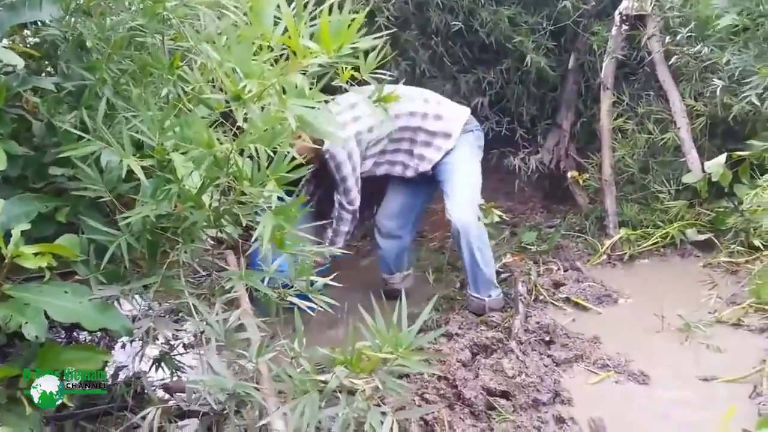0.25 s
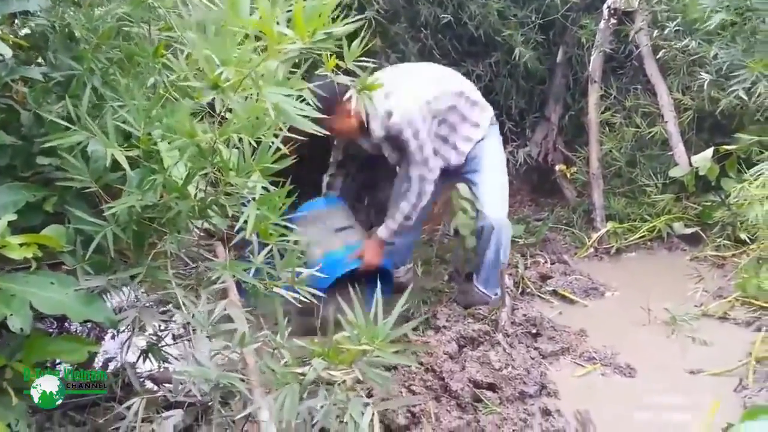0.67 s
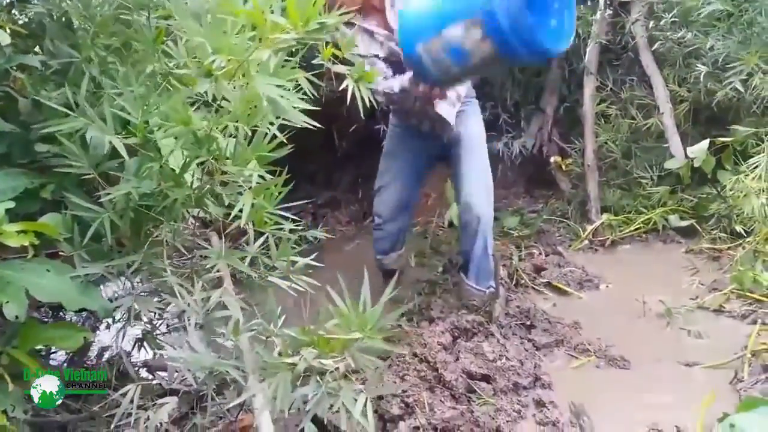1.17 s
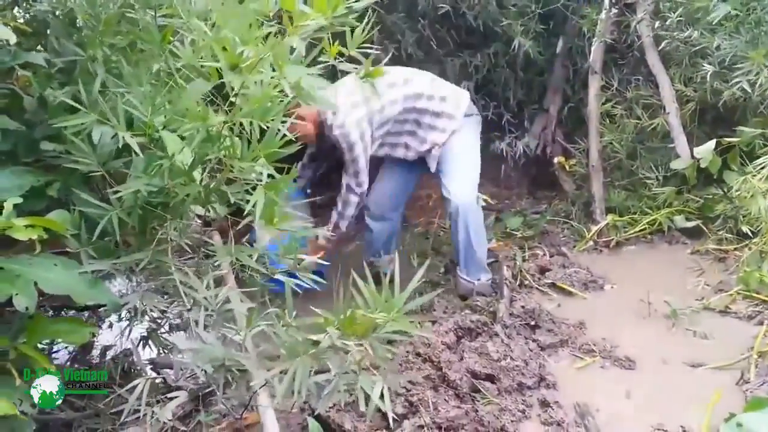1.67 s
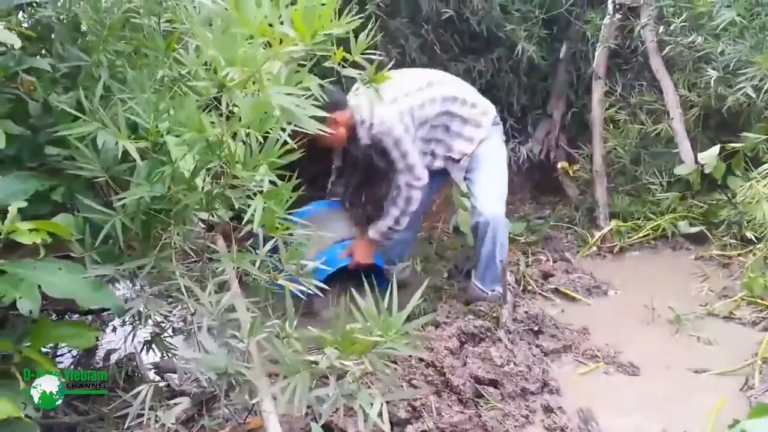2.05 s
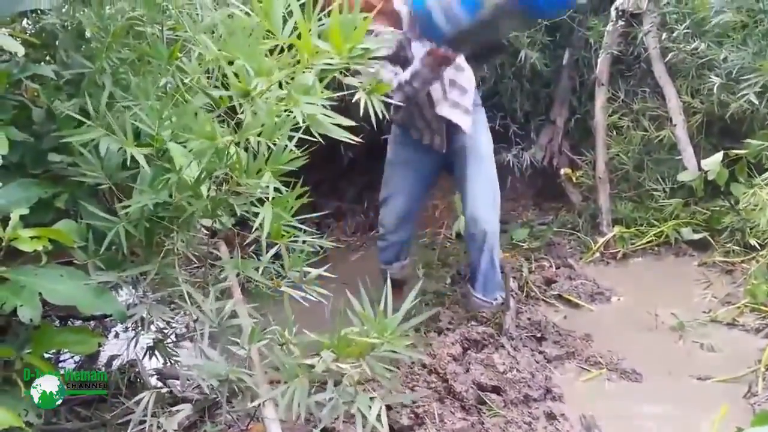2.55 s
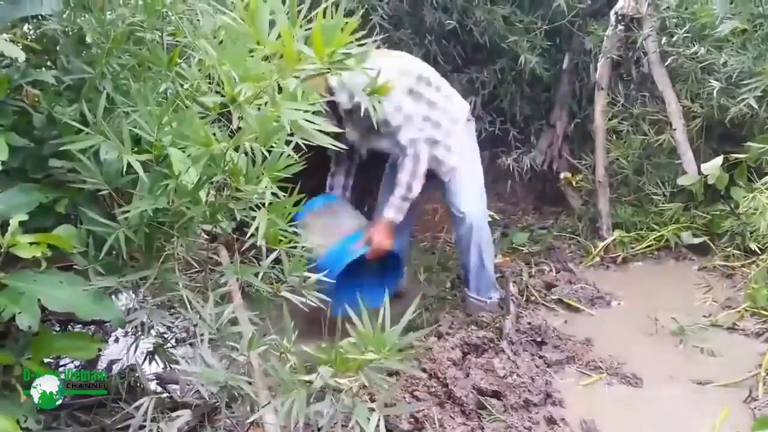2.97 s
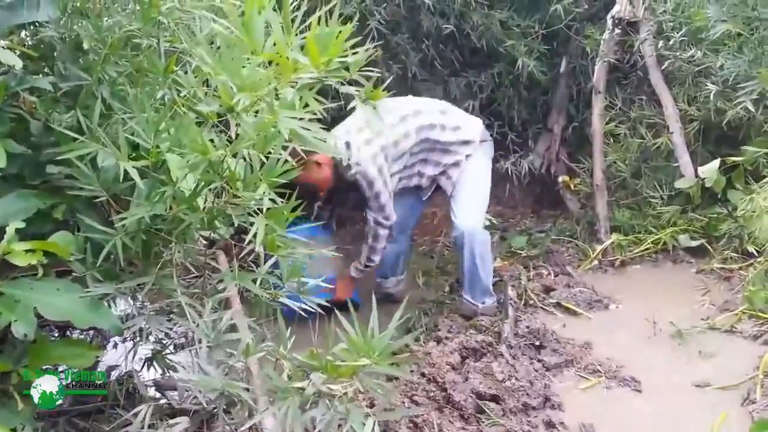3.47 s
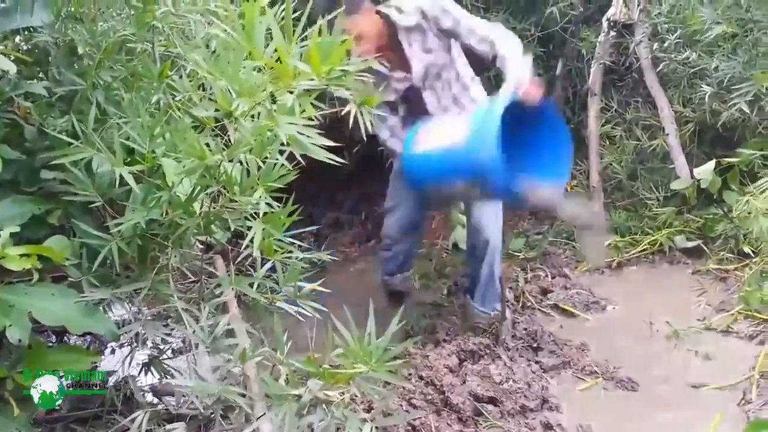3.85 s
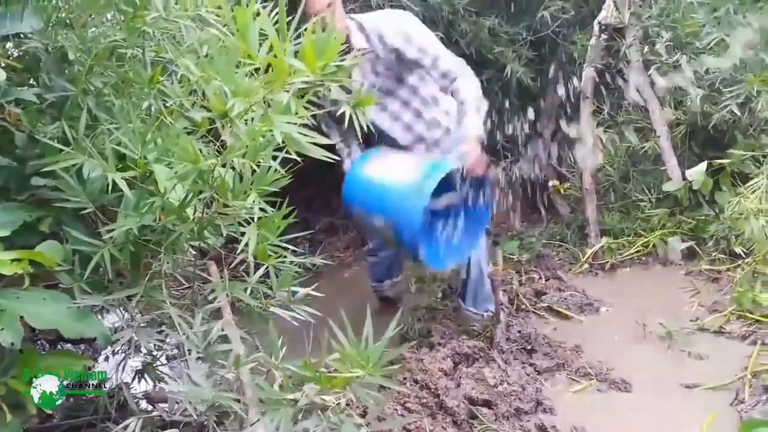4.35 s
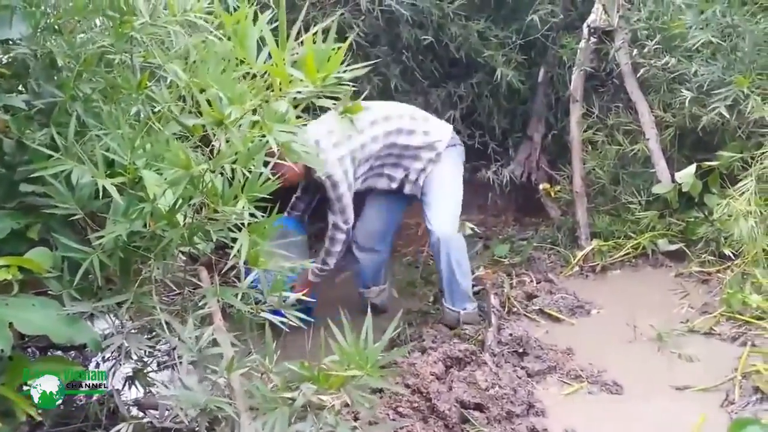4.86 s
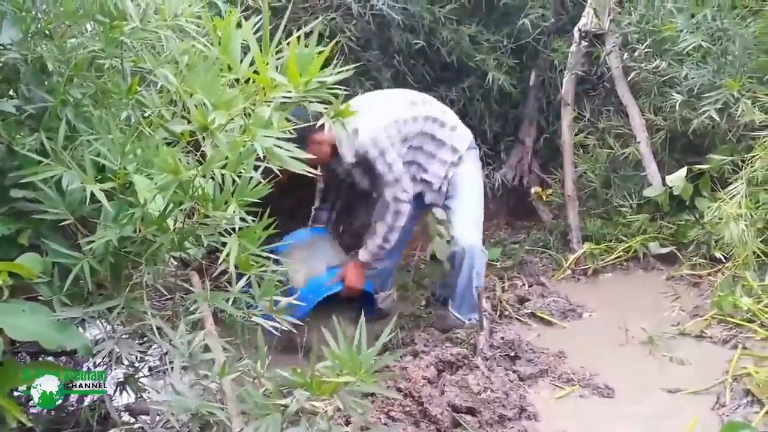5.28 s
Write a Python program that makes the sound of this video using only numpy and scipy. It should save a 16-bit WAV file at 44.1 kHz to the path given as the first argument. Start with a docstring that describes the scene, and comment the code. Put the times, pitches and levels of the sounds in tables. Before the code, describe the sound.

A plastic bucket bails a shallow, muddy pool among bushes. Water swishes as it is scooped, then the wire handle clatters on the rim and the load is thrown out in a splash, followed by drips and bubbling. This repeats about every one and a half seconds, with an occasional hollow thump from the bucket. A low, gusty air rumble lies underneath. The sound is fairly close and dry, leaning slightly left.

```python
"""Water swishes and a wire handle clatters as a plastic bucket bails a shallow, muddy pool among bushes.
The handle knocks on the rim and sets the bucket ringing; the bucket booms when it bumps the bottom.
Dragged and thrown water makes spray, bubbles and drips, over a low, gusty outdoor rumble.
Leaves add a short echo. The sound reaches the right side later, and duller in the upper middle."""
import sys
import numpy as np
from scipy import signal
from scipy.fft import rfft, irfft
from scipy.io import wavfile

SR = 44100
rng = np.random.default_rng(int(sys.argv[2]) if len(sys.argv) > 2 else 0)


def inscribe(sig):
    """Save sig as 16-bit PCM at rate SR to the path in sys.argv[1].

    A 1-D sig is mono; a 2-D sig holds one channel per row.
    Samples are clipped to [-1, 1] before scaling.
    """
    pcm = np.round(np.clip(np.atleast_2d(sig).T, -1, 1) * 32767)
    wavfile.write(sys.argv[1], SR, pcm.astype(np.int16))


N = 243431
FFT_SIZE = N + 8000
HZ = np.maximum(np.fft.rfftfreq(FFT_SIZE, 1 / SR), 1)   # the frequencies that filters work on
KNOCK_RISE_S = 0.001488

# Handle knocks: start_s, level_db, pitch_hz, fade_s (time to fall 60 dB), snap_db (relative to level_db)
KNOCKS = [(0.241, -29, 3600, 0.2, -5), (0.264, -30.5, 3780, 0.048, 5), (0.456, -33, 3180, 0.023, 3),
          (0.468, -23.5, 663, 0.11, -20), (0.602, -14, 755, 0.023, -7), (0.618, -28, 2850, 0.019, -9),
          (0.7609, -3.5, 3880, 0.046, -8.5), (0.765, -5.5, 1605, 0.05, -26), (0.788, -12.5, 1580, 0.22, -7),
          (0.839, -12, 890, 0.12, -17), (0.847, -14, 2330, 0.16, -6), (0.9957, -3, 3240, 0.031, -8),
          (1.002, -3, 1820, 0.073, -9), (1.018, -11.5, 1220, 0.15, -14), (1.037, -9, 1120, 0.035, -14),
          (1.038, -5.5, 2830, 0.046, -7), (1.052, -9.5, 1013, 0.085, -9), (1.076, -20, 1280, 0.1, -3),
          (1.227, -17.5, 986, 0.046, -9), (1.238, -18.5, 2370, 0.041, -15), (1.254, -17, 2630, 0.043, -16),
          (1.264, -18, 2100, 0.074, -13), (1.367, -19.5, 970, 0.081, -15), (1.369, -25.5, 2330, 0.11, -26),
          (1.388, -26, 2900, 0.063, -15), (1.392, -20.5, 895, 0.042, -14),
          (2.246, -22.5, 4470, 0.021, -1.5), (2.315, -3, 2870, 0.018, -6), (2.317, -8, 1022, 0.05, -22),
          (2.324, -11.5, 2470, 0.073, -22), (2.367, -13, 880, 0.11, -7), (2.5109, -4, 4090, 0.023, -7),
          (2.516, -9.5, 2200, 0.076, -5.5), (2.534, -12, 983, 0.081, -6.5), (2.5532, -7, 2840, 0.032, -2.5),
          (2.565, -13, 2470, 0.21, -28), (2.551, -11.5, 896, 0.059, -22), (2.749, -24, 2140, 0.19, -4),
          (2.772, -24, 2680, 0.036, -21), (2.777, -21, 1147, 0.1, -10), (2.851, -22, 1200, 0.039, -9),
          (2.867, -25, 775, 0.11, -12), (3.478, -23.5, 3030, .028, 7.5), (3.547, -13, 2970, 0.061, 0),
          (3.569, -17.5, 648, 0.12, -16), (3.7904, -7.5, 1410, 0.081, -7), (3.809, -14, 1820, 0.091, -5),
          (3.847, -12.5, 2230, 0.015, -0.5), (3.901, -26, 1180, 0.027, -12),
          (3.908, -23.5, 2340, 0.13, -21.5), (3.948, -23, 3680, 0.049, -5), (3.969, -18.5, 3130, 0.28, -8),
          (4.001, -10.5, 2330, 0.037, -9), (4.036, -10.5, 2550, 0.017, -4.5),
          (4.041, -8, 2137, 0.039, -9.5), (4.0694, -7.5, 2560, 0.047, -2), (4.322, -17, 1017, 0.11, -7.5),
          (4.337, -21.5, 2310, 0.023, -15.5), (4.348, -17.5, 2460, 0.097, -10.5),
          (4.438, -26, 887, 0.084, -12), (4.468, -23, 890, 0.028, -28), (4.7448, -15, 3930, 0.06, 4),
          (5.209, -33, 1750, 0.13, -19), (5.452, -27.5, 1660, 0.36, -19), (5.473, -23, 4450, 0.11, 4),
          (5.475, -33, 1270, 0.06, -10)]
# The bucket hitting the bottom: start_s, level_db, pitch_hz
BUMPS = [(0.474, -37, 144), (0.559, -35, 153), (0.581, -31.5, 158), (0.598, -28.5, 160), (0.772, -27, 225),
         (0.845, -30.5, 237), (0.935, -36.5, 170), (1.369, -40.5, 135), (2.024, -14, 153.2),
         (2.294, -36, 240), (2.329, -27.5, 237), (2.429, -38.5, 166), (2.512, -40.5, 140),
         (2.747, -37, 133), (3.557, -24.5, 137), (3.793, -36.5, 222), (3.993, -29, 157),
         (4.044, -36.5, 142), (4.332, -40, 135), (5.165, -34, 137), (5.474, -44, 238)]


def handle_clatter():
    """Wire hits plastic: a snap and a flurry of tiny touches. Where it lands decides which tones ring."""
    # The natural tones of wall and handle: pitch_hz, level_db, fade_s
    tones = [(350, 2, .07), (425, -1, .07), (645, -9, .06), (785, -6, .14), (905, -2, .07), (985, -4, .055),
             (1105, -3, .05), (1240, -2, .07), (1345, -2, .09), (1560, -2, .04), (1930, -4, .04),
             (2130, -4, .045), (2340, -4, .04), (2530, -4, .055), (2660, -4, .045), (2860, -4, .045),
             (3300, -5, .035), (3680, -3, .035), (4050, -3, .035), (4600, -7, .03), (5300, -8, .025)]
    # Times when the bucket holds no water: start_s, end_s
    empty_times = [(1.045, 1.5), (2.54, 2.95), (4.06, 4.55)]
    wet_fade_share, wet_db = 0.47, 4   # water against the wall makes the ring shorter but stronger
    t = np.arange(6000) / SR
    tone_hz = np.array(tones)[:, 0]
    flurries, firm_hits = np.zeros((2, len(tones), N + len(t)))
    snap_gain, cracks, wall_patch = np.zeros((3, N + len(t)))
    for start_s, level_db, hz, fade_s, snap_db in KNOCKS:
        start, top = round(start_s * SR), round((start_s + KNOCK_RISE_S) * SR)
        fade_db = -60 * np.maximum(t - KNOCK_RISE_S, 0) / np.clip(fade_s, .005, .3)
        flurry = np.minimum(t / KNOCK_RISE_S, 1) * from_db(fade_db)
        octaves = np.log2(tone_hz / hz)
        nearest_db = 6.6 * np.exp(-(octaves / 0.14) ** 2)   # the tone under the wire rings out most
        luck_db = rng.normal(0, 2.5, len(tones))
        share = from_db(level_db - 29 - 3.2 * octaves ** 2 + nearest_db + luck_db)
        flurries[:, start:][:, :len(t)] += share[:, None] * flurry
        firm_hits[:, top] += share * from_db(14.5 + snap_db / 2)   # one firm hit tops each flurry
        cracks[top] += from_db(level_db + snap_db + 5)
        snap_gain[start:][:len(t)] += from_db(level_db + snap_db - 60 * t / 0.019)
        # The patch of wall under the wire sounds its own pitch; higher ones die sooner.
        patch_db = level_db - 16 - snap_db / 4 - 60 * t / 0.084 * np.sqrt(hz / 1000)
        patch_gain = from_db(patch_db) * (1 - np.exp(-t / KNOCK_RISE_S))
        wall_patch[start:][:len(t)] += patch_gain * np.sin(2 * np.pi * hz * t)
    empty = sum((np.arange(N) > a * SR) & (np.arange(N) < b * SR) for a, b in empty_times)
    touches = random_clicks(1800, uneven_db=2.5)[0]   # every touch reaches all the tones at once
    ringing = np.zeros(N)
    for k, (hz, level_db, fade_s) in enumerate(tones):
        contacts = (-1) ** k * from_db(level_db) * (touches * flurries[k, :N] + firm_hits[k, :N])
        ringing += ring(contacts * empty, hz, fade_s)
        ringing += from_db(wet_db) * ring(contacts * (1 - empty), hz, fade_s * wet_fade_share)
    snap = rms_one(random_clicks(9000, uneven_db=-1)[0]) * snap_gain[:N] + cracks[:N]
    snap = pass_filter(snap, "band", [1100, 6300], order=3)
    return pass_filter(ringing, "high", 280) + wall_patch[:N] + snap


def bottom_bumps():
    """The hollow bucket booms when its bottom is struck; soft mud rounds the blow and the pitch sags."""
    out = np.zeros(N)
    for start_s, level_db, hz in BUMPS:
        start = round(start_s * SR)
        t = np.arange(min(8000, N - start)) / SR
        rise = 1 - np.exp(-(t / 0.0041) ** 2)
        fade = from_db(-60 * t / 0.094) + 0.096 * from_db(-60 * t / .3)
        boom = np.sin(2 * np.pi * hz * (t + 0.0007 * (1 - np.exp(-t / 0.028))))
        out[start:][:len(t)] -= from_db(level_db + 6) * rise * fade * boom
    return pass_filter(out, "high", 95)


def water_levels():
    """How loud the stirred water is over time: spray, mist, splatter and slosh, each in dB."""
    # The pool trickling between scoops: spray_db, mist_db, splatter_db, slosh_db
    trickle = [-59.5, -58.5, -73, -70.5]
    # Water rushing as the bucket is lowered, dragged and lifted, a list per scoop: time_s, spray_db, mist_db
    scoops = [
        [(0.0, -52, -52), (0.05, -55, -61.5), (0.27, -49.5, -56.5), (0.4, -48, -54.5), (0.444, -52.5, -59.5),
         (0.6, -50.5, -75), (0.73, -54, -55), (0.757, -38.5, -38)],
        [(1.5, -60, -56), (1.584, -47.5, -41), (1.66, -52.5, -53), (1.69, -47, -42), (1.782, -40.5, -41.5),
         (1.868, -35.5, -34.5), (1.954, -37, -39.5), (2.122, -36.5, -36.5), (2.244, -45.5, -45.5),
         (2.3, -38, -43), (2.34, -44, -63)],
        [(2.99, -54, -63), (3.01, -49.5, -41.5), (3.118, -45.5, -45), (3.17, -53, -49), (3.33, -34, -35),
         (3.374, -33.5, -31.5), (3.476, -32, -35.5), (3.63, -37, -36.5), (3.78, -45, -51), (3.93, -48.5, -44),
         (3.96, -43, -47)],
        [(4.56, -65, -63), (4.584, -42.5, -42), (4.656, -39.5, -37.5), (4.74, -30.5, -28), (4.83, -34.5, -38.5),
         (5.054, -41, -41.5), (5.112, -47.5, -46), (5.17, -50.5, -71), (5.27, -50, -67), (5.31, -53.5, -59.5),
         (5.4, -51.5, -58), (5.466, -48.5, -51), (5.52, -51, -46)],
    ]
    # Splashes: peak_s, spray_db, rise_s, fall_s, mist_db, splatter_db (the last two relative to spray_db)
    splashes = [(0.458, -39.5, -0.07, 0.09, -6, -6.5), (0.483, -51, -0.09, 0.27, -3, 6),
                (0.601, -45, -0.04, 0.13, -10, 6.5), (0.761, -21.5, -0.01, 0.07, -12, -1.5),
                (0.797, -24, -0.01, 0.1061, -2.5, -28), (0.923, -23.5, 0.08, 0.0957, -4.5, -10),
                (1.0, -30.5, 0.014, 0.1658, -6, -7), (1.1, -37.5, 0.2, -0.03, -15, 2),
                (1.185, -45.5, 0.53, 0.4, -2, -3), (1.26, -50.5, 0.2, 0.2, -17, 5),
                (2.009, -31, 0.02, 0.25, -24, -5), (2.316, -28, -0.01, 0.08, -7.5, 8),
                (2.409, -21.5, 0.05, 0.0771, -7, -30), (2.559, -33.5, 0.13, 0.16, -26, -0.5),
                (2.645, -33.5, 0.34, 0.07, -4.5, -24), (2.76, -46.5, -0.05, 0.05, -7.5, 13.5),
                (3.553, -27.5, -0.0254, 0.136, -9.5, 1), (3.779, -48, -0.08, 0.13, -18, 15),
                (3.856, -40, -0.1, 0.13, -9, -21), (3.95, -24, 0.006, 0.12, -7, -32),
                (4.044, -31, -0.04, 0.11, -5, 5), (4.25, -48, 2.5, 0.5, -2.5, -23),
                (4.35, -44.5, 0.08, 0.1, -17, 5), (4.627, -29, 0.0057, -0.05, -6, -12),
                (4.684, -36, 0.1, 0.02, 1, -16.5), (4.724, -25.5, 0.06, -0.024, -3, -31),
                (4.747, -24, -0.01, -0.0345, -7, -18), (5.2, -49.5, 0.47, 0.16, -7.5, 4),
                (5.41, -46.5, 0.04, -0.07, -15, 3.5), (5.475, -34.5, -0.1, 0.16, -16, -12),
                (5.51, -45, -0.06, 0.15, 0, -2)]
    power = from_db(2 * np.array(trickle))[:, None] * np.ones(N)   # doubling the dB gives power
    for scoop in scoops:
        spray_db, mist_db = levels_over_time(scoop)
        coarse_db = spray_db + 0.81 * (spray_db - mist_db)   # little mist means big drops
        slosh_db = (coarse_db + spray_db) / 2 - 14
        power += from_db(2 * np.array([spray_db, mist_db, coarse_db - 13, slosh_db]))
    for peak_s, spray_db, rise_s, fall_s, mist_db, splatter_db in splashes:
        slosh_db = 0.92 * splatter_db - 9   # coarse splashes slosh more
        levels_db = spray_db + np.array([0, mist_db, splatter_db, slosh_db])
        power += from_db(2 * levels_db)[:, None] * burst(peak_s, rise_s, fall_s)
    for start_s, level_db, *_ in KNOCKS:   # each knock shakes loose some splatter and slosh
        jolt = from_db(2 * 0.61 * level_db) * burst(start_s + KNOCK_RISE_S, 2 * KNOCK_RISE_S, 0.039)
        power[2:] += from_db(2 * np.array([[-31], [-37]])) * jolt
    for start_s, level_db, _ in BUMPS:   # each bump sloshes the water in the bucket
        power[3] += from_db(2 * (level_db - 20)) * burst(start_s + 0.014, rise_s=0.0061, fall_s=0.16)
    return 10 * np.log10(power)


def spray(spray_db, mist_db):
    """Droplets burst on water and leaves in uneven waves; the finest ones make a high, misty hiss."""
    # The tone colour of the droplets: pitch_hz, level_db
    drop_colour = [(880, -10.5), (1500, -10), (2040, -4), (3450, -2), (4930, 2), (5640, 2), (6950, -17.5),
                   (8000, -13), (10400, -77), (17600, -120)]
    # The tone colour of the fine mist: pitch_hz, level_db
    mist_colour = [(3820, -25.5), (6500, -8.5), (7150, -11), (13500, -13), (14800, -27), (15000, -25),
                   (15200, -77)]
    low_db, high_db = over_pitch(drop_colour), over_pitch(mist_colour)
    drops = rms_one(filtered(random_clicks(7000, uneven_db=3), from_db(low_db)))
    mist = rms_one(filtered(random_clicks(16000, uneven_db=0.5), from_db(high_db)))
    big_drops = rms_one(filtered(random_clicks(160, uneven_db=3), from_db((low_db + high_db) / 2)))
    drops += from_db(-11) * big_drops
    waves_db = 1.3 * drift(28.5)
    return from_db(spray_db + waves_db + 0.064 * drift(27)) * drops + from_db(mist_db + waves_db) * mist


def bubbles(level_db, per_s, low_hz, high_hz, cycles):
    """Pockets of trapped air ring for some cycles, each at one of 14 pitches."""
    births = random_clicks(per_s, uneven_db=2.5)
    pitch_choice = rng.integers(0, 14, N)
    pitches = np.geomspace(low_hz, high_hz, 14)
    rings = sum(ring(births * (pitch_choice == k), hz, cycles / hz) for k, hz in enumerate(pitches))
    return from_db(level_db) * rms_one(pass_filter(rings, "high", low_hz * 0.65, order=4))


def drips():
    """A drop lands with a tick and a short, rising bubble note; the smallest drops are mostly tick."""
    # Single drops: start_s, level_db, pitch_hz
    drops = [(0.009, -42.5, 1080), (0.085, -45.5, 2370), (0.187, -40, 2620), (0.197, -40, 3720),
             (0.251, -39, 1280), (0.295, -38, 2620), (0.307, -43, 2380), (0.378, -38, 1190),
             (0.527, -32.5, 1320), (0.585, -40, 2400), (0.638, -32.5, 2450), (0.669, -37, 3500),
             (1.184, -26.5, 5340), (1.611, -25, 5850), (1.648, -23, 4930), (1.677, -36, 4630),
             (1.823, -21.5, 5570), (1.86, -18.5, 5330), (2.946, -41, 2950), (3.0, -29, 4290),
             (3.023, -23.5, 5100), (3.11, -25, 4270), (3.174, -21, 5170), (3.22, -26.5, 4130),
             (3.267, -21, 5460), (3.33, -26, 697), (3.424, -18, 5500), (4.588, -39, 5070),
             (4.612, -24, 5060), (4.622, -17.5, 5130), (4.635, -20.5, 5500), (4.644, -28.5, 800),
             (4.687, -15, 5250), (4.72, -20.5, 5550), (4.768, -20.5, 5100), (4.849, -28, 5270),
             (5.028, -39, 5100), (5.149, -28, 3900), (5.271, -33, 4300), (5.2, -31, 1670),
             (5.222, -37.5, 1115), (5.395, -29, 3840)]
    out, t = np.zeros(N + 2000), np.arange(2000) / SR
    for start_s, level_db, hz in drops:
        plink_gain = from_db(-60 * t * hz / 45) * np.minimum(t * hz / 1.4, 1)
        plink = plink_gain * np.sin(2 * np.pi * hz * t * (1 + 3.9 * t))
        noise = pass_filter(rng.standard_normal(len(t)), "band", [hz * 0.77, hz * 1.404])
        tick = noise * from_db(-60 * t / 0.012)
        smallness = np.clip((hz - 3200) / 900, 0, 1)
        drip = (1 - 0.23 * smallness) * plink + (0.13 + 1.11 * smallness) * tick
        out[round(start_s * SR):][:len(t)] += from_db(level_db + 2.5) * drip
    return np.array([out[:N], np.roll(out[:N], 37)])


def air_rumble():
    """Outdoor air rumbles low and swells in gusts."""
    # The tone colour of the rumble: pitch_hz, level_db
    colour = [(15, -34), (25, -22), (49, 34.5), (82, 33.5), (179, 15), (321, 19), (519, 16), (782, -87),
              (1500, -20), (1950, -42), (3300, -120)]
    gusts = from_db(-60 + 4.5 * drift(4.7))
    return gusts * rms_one(filtered(rng.standard_normal((2, N)), from_db(over_pitch(colour))))


def leaf_echo():
    """Leaves scatter a short tail, weaker in the bass; returns a filter for each side."""
    t = np.arange(6000) / SR
    tails = rng.standard_normal((2, len(t))) * from_db(-60 * t / 0.11) * (t > .003)
    tails /= np.sqrt(np.sum(tails ** 2) / 2)
    return 1 + from_db(-13.5) * rfft(tails, FFT_SIZE) * np.minimum(HZ / 1500, 1)


def left_and_right(surroundings, bucket):
    """Two spots a hand's width apart share one wave; the right is late, shaded and has water of its own."""
    # How much of the water and air both sides share: pitch_hz, share (0 to 1)
    likeness = [(60, 0.85), (300, 0.8), (1000, 0.56), (2500, 0.067), (5000, 0.021), (10000, 0.016)]
    # How far the left side is ahead: pitch_hz, lead_radians
    lead = [(0, 0), (950, .8), (1460, 1.8), (2760, 7.5), (4310, 12.), (15500, 44.)]
    # How much louder the left side is: pitch_hz, level_db
    shading = [(60, 1), (250, 1.5), (700, 3), (1200, -0.5), (1550, 8.5), (1900, 11), (2800, 13.5),
               (4400, 15), (6000, 6.5), (7500, 0), (9500, -3), (15000, 0)]
    shared, separate = surroundings
    alike = over_pitch(likeness)
    delay = np.exp(-1j * np.interp(HZ, *np.transpose(lead)))
    left = shared + bucket
    right = filtered(shared, alike * delay) + filtered(bucket, delay)
    right += filtered(separate, np.sqrt(1 - alike ** 2))
    shade = from_db(over_pitch(shading) * np.array([[.5], [-.5]]))
    return filtered(np.array([left, right]), shade * leaf_echo())


def from_db(db):
    """Turn decibels into a gain."""
    return 10 ** (np.asarray(db) / 20)


def rms_one(x):
    """Scale a signal to an average power of 1."""
    return x / np.sqrt(np.mean(x ** 2) + 1e-20)


def levels_over_time(rows):
    """Join timed levels with straight lines; silent before and after them."""
    times_s, *columns = np.transpose(rows)
    return [np.interp(np.arange(N) / SR, times_s, db, left=-120, right=-120) for db in columns]


def over_pitch(points):
    """Join (pitch_hz, value) points into a curve over HZ."""
    pitch_hz, values = np.transpose(points)
    return np.interp(np.log(HZ), np.log(pitch_hz), values)


def filtered(x, response):
    """Multiply each frequency of a signal by its own gain."""
    return irfft(rfft(x, FFT_SIZE) * response, FFT_SIZE)[..., :N]


def pass_filter(x, kind, edge_hz, order=2):
    """Let only the highs or one band through; a higher order cuts more steeply."""
    return signal.sosfilt(signal.butter(order, edge_hz, kind, fs=SR, output="sos"), x)


def drift(rate_hz):
    """A smooth random wander, about 1 in size."""
    step = 40   # samples between points
    r = np.exp(-2 * np.pi * rate_hz * step / SR)
    slow = signal.lfilter([1], [1, -2 * r, r * r], rng.standard_normal(N // step + 2002))[2000:]
    return np.interp(np.arange(N) / step, np.arange(len(slow)), rms_one(slow))


def ring(clicks, hz, fade_s):
    """Each click starts a pure tone that falls 60 dB in fade_s."""
    r, angle = from_db(-60 / (fade_s * SR)), 2 * np.pi * hz / SR
    return signal.lfilter([0, np.sin(angle)], [1, -2 * r * np.cos(angle), r * r], clicks + 1e-18)


def random_clicks(per_s, uneven_db):
    """Two unrelated streams of random clicks of uneven size."""
    sizes = from_db(uneven_db * np.minimum(rng.exponential(1, (2, N)), 5)) * rng.choice([-1, 1], (2, N))
    return sizes * (rng.random((2, N)) < per_s / SR)


def burst(peak_s, rise_s, fall_s):
    """Power that climbs 20 dB in rise_s to 1, then drops 20 dB in fall_s; times under 1 ms count as 1 ms."""
    t = np.arange(N) / SR - peak_s
    return from_db(-40 * np.where(t < 0, -t / max(rise_s, 1e-3), t / max(fall_s, 1e-3)))


def scene():
    """Water, outdoor air and the bucket, heard in stereo."""
    spray_db, mist_db, splatter_db, slosh_db = water_levels()
    water = spray(spray_db, mist_db) + drips()
    water += bubbles(splatter_db, per_s=1200, low_hz=758, high_hz=3240, cycles=10.5)
    water += bubbles(slosh_db, per_s=900, low_hz=185.5, high_hz=710, cycles=1.87)
    water += bubbles(spray_db - 10.5, per_s=170, low_hz=1281, high_hz=4010, cycles=97)   # stray plinks
    return left_and_right(water + air_rumble(), handle_clatter() + bottom_bumps())


def record(dry):
    """Squeeze the loudest knocks and cut the very highest treble."""
    cutoff_hz = 15400
    squeezed = dry / (1 + np.abs(dry) ** 6) ** (1 / 6)
    return signal.sosfilt(signal.cheby2(14, 80, cutoff_hz, fs=SR, output="sos"), squeezed)


dry = scene()
out = record(dry)
inscribe(out)
```